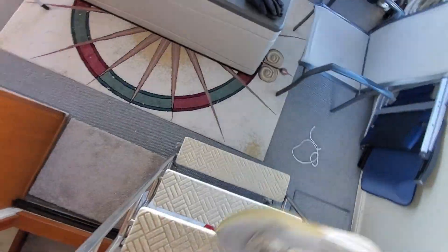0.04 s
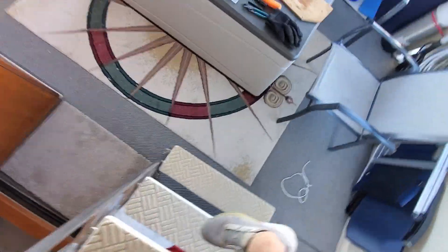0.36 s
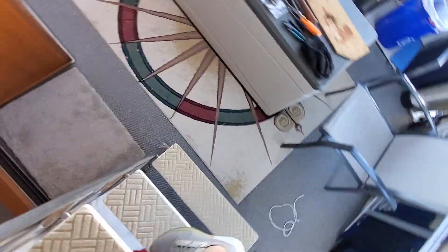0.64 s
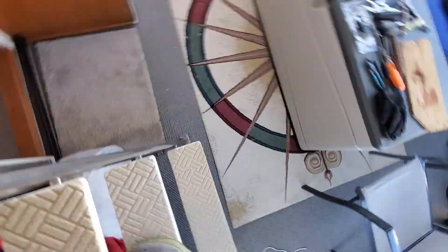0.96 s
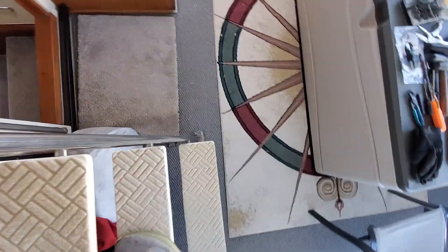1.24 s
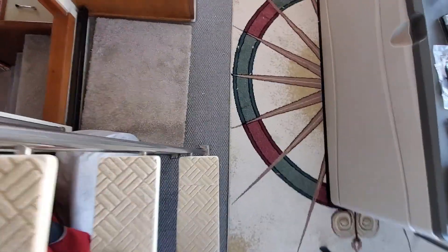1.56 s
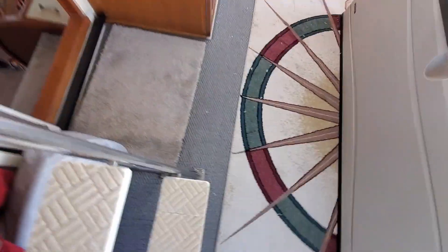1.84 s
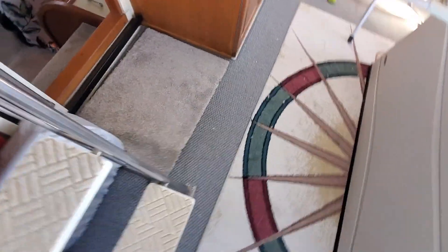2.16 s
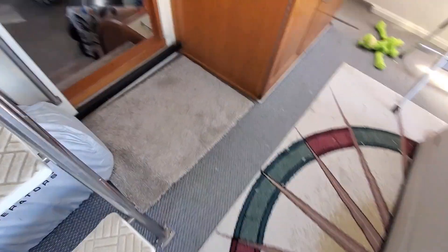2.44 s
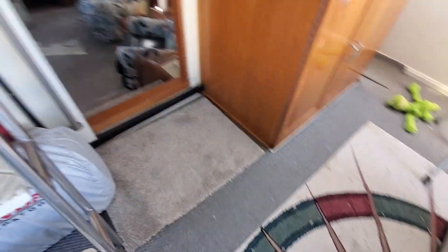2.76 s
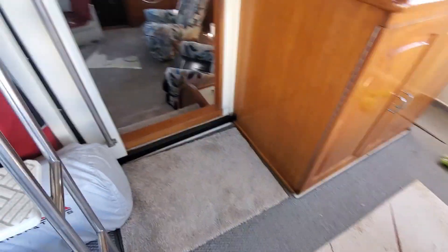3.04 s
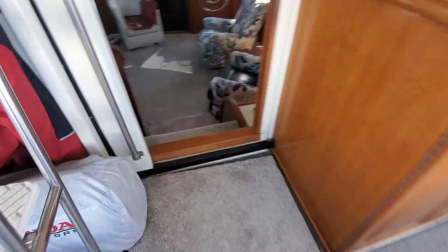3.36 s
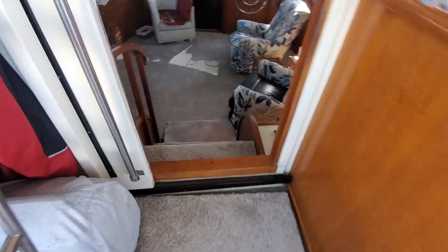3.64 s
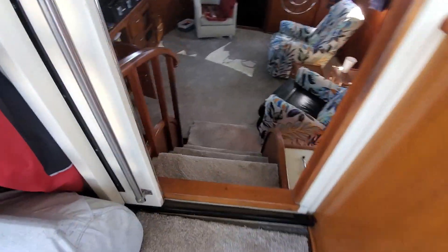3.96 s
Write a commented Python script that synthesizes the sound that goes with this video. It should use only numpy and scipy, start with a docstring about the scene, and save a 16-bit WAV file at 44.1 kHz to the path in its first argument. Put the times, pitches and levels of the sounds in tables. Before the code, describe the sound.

Shoes knocking and scuffing down steps in a boat cabin, with sharp clicks and a metal clank.

```python
"""Shoes knock and scuff down a short ladder into a boat's enclosed deck; a hand-held phone's case ticks.
Each step rings the ladder and cabin; full weight thuds in the deck.
A loose metal fitting pings, then clanks home against its frame.
Clothes rustle close by; machinery hums low through the hull."""
import sys
import numpy as np
from scipy import signal
from scipy.fft import rfft, irfft
from scipy.io import wavfile

SR = 44100
rng = np.random.default_rng(int(sys.argv[2]) if len(sys.argv) > 2 else 0)


def log_audio(samples):
    """Write samples as a 16-bit WAV file to the path given in sys.argv[1]."""
    # one column per channel
    frames = np.atleast_2d(samples).T
    # limit to full scale, then quantise
    limited = np.clip(frames, -1, 1)
    pcm = np.round(limited * 32767).astype(np.int16)
    wavfile.write(sys.argv[1], SR, pcm)


N = 176400
T = np.arange(N) / SR
AGE_S = T[:SR]  # time since a blow
CABIN_T60_S, CABIN_SLOPE = .27, .21


def amp(db):
    """Decibels to gain."""
    return 10 ** (np.asarray(db) / 20)


def unit(x):
    """Scale to rms 1."""
    return x / np.sqrt(np.mean(x ** 2))


def curve(points):
    """Gain over time from (time_s, level_db) points."""
    return amp(np.interp(T, *np.array(points).T))


def add(out, start_s, x):
    """Mix x in at start_s."""
    i = int(start_s * SR)
    out[:, i:i + x.shape[-1]] += x[..., :N - i]


def colour(x, points):
    """Minimum-phase filter through (freq_hz, gain_db) points."""
    n = 2 * x.shape[-1]
    hz, db = np.array(points).T
    bins_hz = np.maximum(np.fft.rfftfreq(n, 1 / SR), 1)
    cepstrum = irfft(np.log(amp(np.interp(np.log(bins_hz), np.log(hz), db))))
    cepstrum[1:n // 2] *= 2
    cepstrum[n // 2 + 1:] = 0
    return irfft(rfft(x, n) * np.exp(rfft(cepstrum, n)))[..., :n // 2]


def soften(x, cutoff_hz):
    """A soft contact takes the treble off."""
    return signal.sosfilt(signal.butter(2, cutoff_hz, fs=SR, output="sos"), x)


def coherence(hz):
    """Likeness of a diffuse field at the two microphone ports."""
    gap_m, sound_m_s = .15, 343
    return .97 * np.sinc(2 * hz * gap_m / sound_m_s)


def diffuse(size):
    """Stereo noise arriving from all walls."""
    mid, side = rfft(rng.standard_normal((2, size)))
    alike = coherence(np.fft.rfftfreq(size, 1 / SR))
    mid, side = mid * np.sqrt((1 + alike) / 2), side * np.sqrt((1 - alike) / 2)
    return irfft(np.array([mid + side, mid - side]), size)


def wander(rate_hz):
    """Smooth random curve, spread near 1."""
    return np.interp(T * rate_hz, np.arange(8192), rng.standard_normal(8192))


def ring(modes):
    """Struck modes; the higher ones reach the two ports out of phase."""
    out = 0
    for hz, db, t60_s in modes:
        lag_rad = np.arccos(coherence(hz)) * np.array([[.5], [-.5]])
        tone = np.sin(2 * np.pi * (hz * AGE_S + rng.random()) + lag_rad)
        out = out + amp(db) * tone * np.exp(-np.log(1000) * AGE_S / t60_s)
    onset = np.minimum(AGE_S * modes[0][0] * 2, 1)  # half a cycle of the first mode
    return out * onset / np.sqrt(sum(amp(db) ** 2 for _, db, _ in modes) / 2)


def split(modes, spread, count):
    """Each mode of a jointed part is a cluster of close, beating partials."""
    return [(hz * (1 + spread * (step + rng.uniform(-.66, .5) / count)), db, t60_s)
            for hz, db, t60_s in modes for step in np.linspace(-1, 1, count)]


def dense_ring(spectrum, t60_s, slope):
    """Dense modes as decaying noise; t60_s holds at 1 kHz and divides by 2**slope per octave."""
    octave = np.log2(np.clip(np.fft.rfftfreq(SR, 1 / SR), 125, 16000) / 1000)
    noise_bins = rfft(unit(colour(diffuse(SR), spectrum)))
    out = 0
    for k in range(-3, 5):
        band = irfft(noise_bins * np.maximum(1 - abs(octave - k), 0))
        out = out + band * np.exp(-np.log(1000) * AGE_S / t60_s * 2 ** (k * slope))
    return out


def friction(spectrum, grain_db):
    """Stick-slip rubbing: quick grains inside slower surges."""
    rough = diffuse(N) * amp(grain_db * (wander(rate_hz=700) + 1.34 * wander(rate_hz=35.15)))
    return unit(colour(rough, spectrum))


def strokes(rows):
    """Each slide swells, holds and lets go."""
    attack_share, release_share = .21, .37
    gain = 0
    for start_s, length_s, db in rows:
        ramp = np.minimum((T - start_s) / attack_share, (start_s + length_s - T) / release_share)
        gain = gain + amp(db) * np.clip(ramp / length_s, 0, 1)
    return gain


def machinery():
    """Wavering motor hum over hull rumble, slowly fading."""
    # hull rumble: freq_hz, gain_db
    spectrum = [(25, -32.5), (50, -3.5), (67, 3.5), (78, -6), (92, 2), (115, -12), (145, -9.5),
                (185, -10.5), (250, -24), (400, -29), (900, -35), (15000, -57)]
    # overall fade: time_s, gain_db
    fade = [(.8, -0.5), (2.4, -2.5), (4, -6)]
    hum_hz, hum_db, waver_db, rumble_db = 107.3, -39, .5, -37.5
    hum = np.sqrt(2) * np.sin(2 * np.pi * hum_hz * T) * amp(hum_db + waver_db * wander(rate_hz=3))
    rumble = amp(rumble_db) * unit(colour(diffuse(N), spectrum))
    return (hum + rumble) * curve(fade)


def clothes():
    """Sleeves brush past over a continuous rustle of cloth."""
    # sleeve strokes: start_s, length_s, level_db
    brushes = [(1.02, 0.11, -46), (1.85, 0.16, -41), (2.22, 0.078, -53.5), (2.52, 0.048, -42),
               (3.385, 0.042, -47)]
    # rustle contour: time_s, level_db
    rustle = [(0, -51.5), (.44, -56.5), (.68, -59.5), (.9, -47.5), (1.12, -43.5), (1.22, -52), (1.6, -48.5),
              (1.87, -47.5), (2.45, -45), (2.8, -52.5), (3.5, -49), (3.72, -58), (4, -49.5)]
    # friction spectra: freq_hz, gain_db
    sleeve = [(200, 10.5), (1600, 3), (4500, -2.5), (7000, -7), (15000, -15.5)]
    cloth = [(150, 16), (400, 11), (800, 3.5), (1200, 0.5), (2500, 1.5), (4500, -4.5), (7000, -10),
             (15000, -10)]
    brushing = strokes(brushes) * friction(sleeve, grain_db=2)
    return brushing + curve(rustle) * friction(cloth, grain_db=1.5)


def phone_case():
    """Dry double ticks run through the gripped, hollow case and faintly stir the cabin."""
    # case ticks: start_s, peak_db, cutoff_hz, left_over_right_db, rebound_s, rebound_db, hollow_db
    ticks = [(.1957, -21, 3050, -4.5, 0.00053, -4, -16.5), (0.6652, 1.5, 9200, 6, 0.00032, -2.5, -23.5),
             (0.8653, -3, 6140, 6, 0.0009, -29, -11.5), (1.026, -8.5, 1840, -3.5, 0.0012, -2.5, -7),
             (1.942, -27.5, 16100, 8, 0.0005, 8.5, -34), (2.4001, -15, 3460, -15.5, 0.0093, -15, -28)]
    # case response: freq_hz, gain_db
    spectrum = [(100, -0.5), (600, -4), (1200, 0), (3100, 6.5), (4300, 1.5), (6000, 7.5), (9000, -18.5),
                (13000, 2.5)]
    # hollow resonance: pitch_hz, level_db, t60_s
    modes = [(574, 0, 0.012)]
    room_db, left_lag_s = -47, .00008
    out = np.zeros((2, N))
    impulse = colour(signal.unit_impulse(SR), spectrum)
    room = amp(room_db) * dense_ring(spectrum, CABIN_T60_S, CABIN_SLOPE)
    for start_s, db, cutoff_hz, pan_db, rebound_s, rebound_db, hollow_db in ticks:
        right = soften(impulse, cutoff_hz)
        left = np.interp(AGE_S - left_lag_s, AGE_S, right, left=0)
        tick = np.array([left, right]) / abs(right).max() * amp(db + np.array([[pan_db], [-pan_db]]) / 2)
        tail = soften(room, cutoff_hz) + amp(hollow_db) * ring(modes)
        add(out, start_s, tick + amp(db) * tail)
        add(out, start_s + rebound_s, amp(rebound_db) * tick)
    return out


def scuffs():
    """Soles slide on the treads."""
    # sole strokes: start_s, length_s, level_db
    slides = [(1.24, 0.32, -41.5), (1.56, .12, -35.5), (1.67, .09, -43), (2.635, 0.064, -41.5)]
    # sole friction: freq_hz, gain_db
    sole = [(100, -9), (380, 18.5), (600, 17), (800, 10.5), (2400, 6.5), (3500, -11.5), (15000, -32)]
    return strokes(slides) * friction(sole, grain_db=2)


def footsteps():
    """Each blow cracks, rings the ladder and fills the cabin; full weight thuds in the deck."""
    # blows on the ladder: start_s, level_db, cutoff_hz
    knocks = [(.732, -20.5, 4060), (0.836, -28, 520), (0.8578, -19, 2040), (1.635, -39, 2940),
              (1.758, -25.5, 1160), (2.242, -46, 1590), (2.367, -36, 420), (2.41, -37.5, 3050),
              (2.621, -34, 523), (3.292, -40, 1230)]
    # weight landing: start_s, level_db
    thuds = [(1.767, -31), (2.4, -27.5)]
    # struck ladder and deck: freq_hz, gain_db
    spectrum = [(60, -17.5), (300, 3.5), (500, -4), (640, -2.5), (780, -4), (1000, -5.5), (1400, -5),
                (2100, -1.5), (4000, -13), (15000, -17.5)]
    # resonances: pitch_hz, level_db, t60_s
    ladder_modes = [(285, -7, .27), (366, -3, .27), (468, 0, .29), (545, -3, .24), (765, -2, .26),
                    (1200, -4, .14), (1620, -6, .13), (2050, -8, .15)]
    deck_modes = [(39, -14.5, 0.53), (92, -9.5, 0.21), (134, -21, 0.75)]
    crack_db, crack_s, ring_db = -2, .006, -3
    crack = 1 + amp(crack_db) * np.exp(-AGE_S / crack_s)
    out = np.zeros((2, N))
    for start_s, db, cutoff_hz in knocks:
        knock = dense_ring(spectrum, CABIN_T60_S, CABIN_SLOPE) * crack + amp(ring_db) * ring(ladder_modes)
        add(out, start_s, amp(db) * soften(knock, cutoff_hz))
    for start_s, db in thuds:
        add(out, start_s, amp(db) * ring(deck_modes))
    return out


def fitting():
    """Loose metal touches lightly, then slams into its frame and rebounds."""
    # light touches: start_s, level_db
    pings = [(2.902, -27.5), (2.9097, -29.5), (2.9592, -17), (3.004, -33)]
    # slam and rebounds: start_s, level_db, cutoff_hz
    clanks = [(2.958, -16, 17000), (2.987, -7.5, 750), (3.001, -12, 507)]
    # resonances: pitch_hz, level_db, t60_s
    fitting_modes = [(1906, -15, .05), (2480, -6.5, 0.03), (4320, 3, 0.055), (4373, 6, 0.083),
                     (6051, -9, 0.16), (7130, -4, 0.036), (9670, -10, 0.087), (12500, -12, 0.062),
                     (14500, -11, 0.12)]
    frame_modes = [(194, -5, .55), (357, -6, .45), (415, -4, .24), (563, -2, .28), (714, -6, .24),
                   (911, -6, .38), (1005, 2, .17), (1089, 0, .15), (1706, -1, .15), (1970, 2, .1),
                   (3100, -1, .07)]
    # dense-mode spectra: freq_hz, gain_db
    fitting_spectrum = [(800, -26), (3500, 2), (14000, -2)]
    frame_spectrum = [(80, -45), (190, -7), (450, -7.5), (750, -0.5), (1000, 2), (1350, -6), (1800, 6.5),
                      (3100, -1.5), (3700, -11), (5000, -10), (6200, -10), (8000, -17), (15000, -36)]
    t60_s, slope = .22, .16
    clatter_db, frame_ring_db = -12.5, -14
    out = np.zeros((2, N))
    for start_s, db in pings:
        ping = ring(split(fitting_modes, spread=.0119, count=5))
        clatter = amp(clatter_db) * dense_ring(fitting_spectrum, t60_s, slope)
        add(out, start_s, amp(db) * (ping + clatter))
    for start_s, db, cutoff_hz in clanks:
        add(out, start_s, amp(db) * soften(dense_ring(frame_spectrum, t60_s, slope), cutoff_hz))
    add(out, clanks[0][0], amp(frame_ring_db) * ring(frame_modes))
    return out


def scene():
    """All sources on the deck, in stereo."""
    return footsteps() + fitting() + scuffs() + clothes() + phone_case() + machinery()


def record(dry):
    """The phone colours the treble, slightly favours the left port and cuts the top."""
    # microphone response: freq_hz, gain_db
    mic = [(4300, 1.5), (5000, -2), (6000, 2.5), (6800, 1), (7600, -6.5), (9300, -4), (10800, 2)]
    left_over_right_db, top_hz = .87, 15900
    heard = colour(dry, mic) * amp(left_over_right_db * np.array([[.5], [-.5]]))
    return signal.sosfilt(signal.ellip(10, .2, 80, top_hz, fs=SR, output="sos"), heard)


dry = scene()
out = record(dry)
log_audio(out)
```